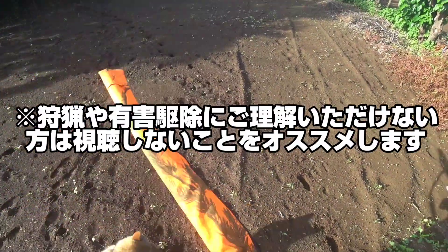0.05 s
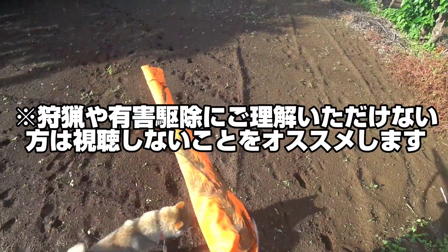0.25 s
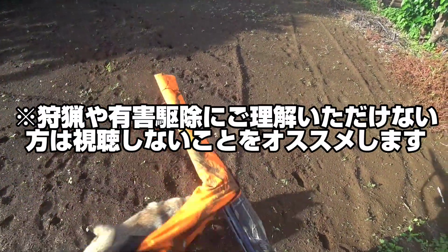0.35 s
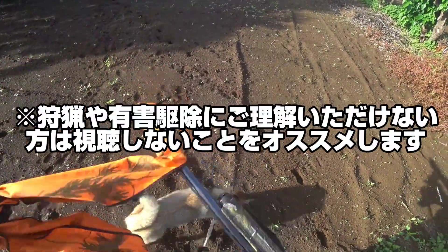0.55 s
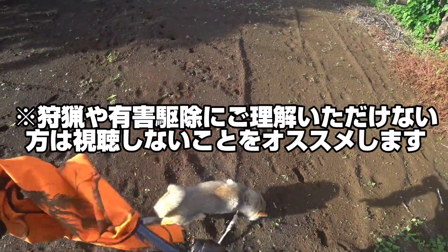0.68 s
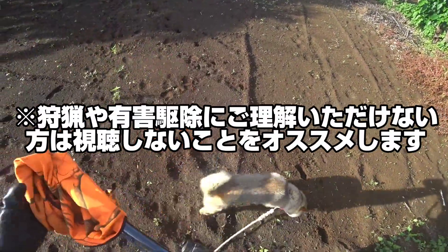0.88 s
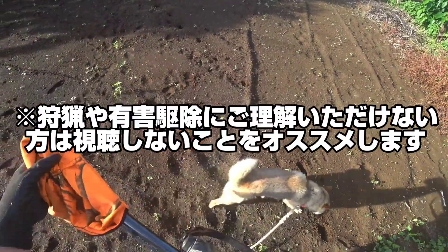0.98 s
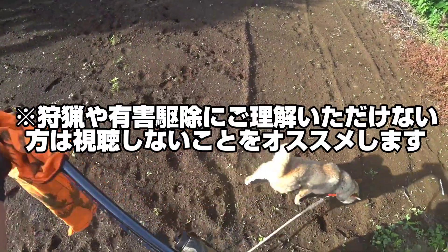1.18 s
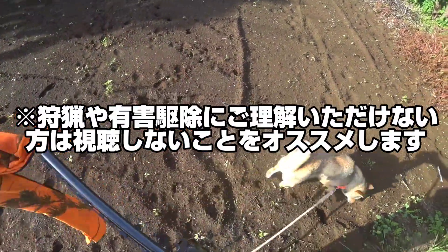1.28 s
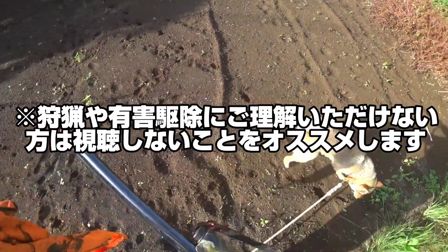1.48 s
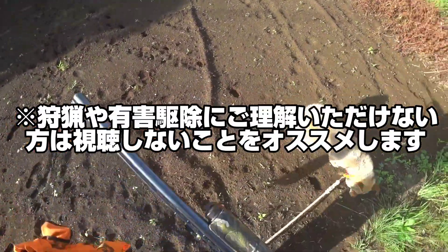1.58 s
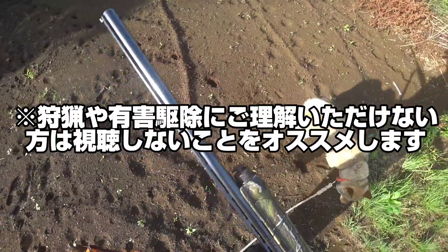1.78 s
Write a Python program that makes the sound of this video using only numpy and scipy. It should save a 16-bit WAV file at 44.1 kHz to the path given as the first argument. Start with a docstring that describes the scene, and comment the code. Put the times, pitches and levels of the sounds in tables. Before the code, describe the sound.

A small metal bell jingles brightly in irregular strikes close to the microphone. A cloth sleeve slides off a gun barrel with two quick fastener rips, then rustles and knocks softly, in a quiet open field.

```python
"""Unsleeving a gun barrel

A quiet open field, stereo microphone close to the hands. A cloth sleeve slides off a long barrel,
its fibres catching and slipping; the fastener's hooks let go in two rips and the gear knocks softly.
A small metal bell swings along, its clapper striking two bright notes at irregular moments.
Faint thin whistles glide behind it towards the end."""
import sys
import numpy as np
from scipy import signal
from scipy.fft import rfft, irfft
from scipy.io import wavfile

SR = 44100
rng = np.random.default_rng(int(sys.argv[2]) if len(sys.argv) > 2 else 0)


def to_wav(s):
    """Save 16-bit WAV."""
    ch = np.atleast_2d(s).T  # columns
    pcm = np.round(np.clip(ch, -1, 1) * 32767)  # PCM
    wavfile.write(sys.argv[1], SR, pcm.astype(np.int16))


N = 81585
T = np.arange(N) / SR


def amp(db):
    """Decibels to gain."""
    return 10 ** (np.asarray(db) / 20)


def unit(x):
    """Scales to an rms of one."""
    return x / np.sqrt(np.mean(x ** 2) + 1e-20)


def colour(x, spectrum):
    """Minimum-phase filter through (f/Hz, level/dB) points; keeps the power of white noise."""
    hz, db = np.transpose(spectrum)
    size = 4096
    bin_hz = abs(np.fft.fftfreq(size, 1 / SR))
    gain = unit(amp(np.interp(np.log(bin_hz + 1), np.log(hz), db)))
    taps = np.fft.ifft(np.exp(np.conj(signal.hilbert(np.log(gain))))).real
    return signal.fftconvolve(x, taps[:size // 2])[:N]


def drift(hz):
    """Smooth random motion up to about the given rate."""
    lowpass = np.exp(-(np.fft.rfftfreq(N, 1 / SR) / hz) ** 2)
    return unit(irfft(rfft(rng.standard_normal(N)) * lowpass, N))


def grains(per_s, spread_db):
    """Dense random clicks of uneven size."""
    size = amp(spread_db * np.minimum(rng.exponential(1, N), 3))
    return unit(size * rng.choice([-1, 1], N) * (rng.random(N) < per_s / SR))


def pan(x, db):
    """Places a sound at the microphone by its left-minus-right level."""
    return x * amp([[db / 2], [-db / 2]])


# side spectrum of diffuse sound, bass nearly mono (f/Hz, level/dB)
SIDE_SPECTRUM = [(30, -14), (90, -14), (250, 0), (1200, 5.5), (4000, 0.5), (11000, 4.5)]
def wide(make, side_db):
    """A shared centre with a weaker independent side."""
    return make() + np.array([[1], [-1]]) * amp(side_db) * colour(make(), SIDE_SPECTRUM)


# spectra of the open air and its rumble (f/Hz, level/dB)
AIR_SPECTRUM = [(15, -49), (25, -1.5), (64, -5), (381, -14), (603, -16), (1470, -20), (2850, -14),
                (4990, -27), (7130, -20), (11000, -33.5), (14300, -78), (22000, -120)]
RUMBLE_SPECTRUM = [(15, 11), (35, -8.5), (63, 10), (100, -6.5), (250, -2), (1000, -103)]
def field(air_db=-54, rumble_db=-54.5):
    """Quiet open air all around the microphone, over a low rumble."""
    def noise(spectrum):
        return wide(lambda: colour(rng.standard_normal(N), spectrum), side_db=-1)
    return amp(air_db) * noise(AIR_SPECTRUM) + amp(rumble_db) * noise(RUMBLE_SPECTRUM)


# course of the slide along the barrel (t/s, relative level/dB)
SLIDE_LEVELS = [(0, -43), (.1, -38.5), (.22, -40), (.3, -40.5), (.45, -54.5), (.6, -58.5), (.7, -57.5),
                (1.85, -64.5)]
# resonances of the hollow sleeve (f/Hz, width/Hz, level/dB)
SLEEVE_RESONANCES = [(643, 74, -12), (1135, 270, -9.5), (1595, 195, -9)]
# cloth rustles (centre t/s, half width/s, level/dB, body re crisp part/dB)
CLOTH_RUSTLES = [(0.333, 0.041, -38.5, -3.5), (0.427, 0.034, -37.5, -11.5), (0.49, 0.0093, -39.5, 8),
                 (0.562, 0.044, -43, -1.5), (0.674, 0.045, -53.5, -2.5), (0.796, 0.024, -47, -6.5),
                 (0.835, 0.015, -43, 1), (0.907, 0.039, -43.5, -11), (0.989, 0.03, -61.5, 9.5),
                 (1.102, 0.039, -46.5, -5.5), (1.205, 0.016, -42, -33), (1.279, 0.064, -47.5, -5.5),
                 (1.458, 0.032, -53, 0), (1.786, 0.012, -55.5, -2)]
# spectra of the slide and of a rustle's crisp part and dull body (f/Hz, level/dB)
SLIDE_SPECTRUM = [(60, -7), (200, -0.5), (480, 0.5), (800, 2.5), (1500, -3.5), (2200, -5.5), (4000, -10),
                  (11000, -19)]
CRISP_SPECTRUM = [(100, -9.5), (1000, 0), (2400, 5.5), (5000, 5.5), (7500, 4), (11000, -2.5)]
BODY_SPECTRUM = [(25, 6), (70, 1), (150, 0.5), (450, 0), (1200, -5), (2500, -7.5), (11000, -39)]
def sleeve():
    """Fibres catch and slip close to the microphone: a hollow slide, then separate rustles."""
    catch = amp(1.5 * drift(hz=68.6))

    def rub(spectrum):
        return wide(lambda: colour(catch * grains(per_s=9000, spread_db=3.5), spectrum), side_db=-9.5)
    friction = rub(SLIDE_SPECTRUM)
    hollow = sum(amp(db) * unit(signal.lfilter(*signal.iirpeak(hz, hz / width, SR), friction))
                 for hz, width, db in SLEEVE_RESONANCES)
    slide_level = amp(np.interp(T, *np.transpose(SLIDE_LEVELS)))
    slide = slide_level * (amp(-4.5) * friction + hollow)
    crisp, body = np.zeros((2, N))
    for centre, width, db, body_db in CLOTH_RUSTLES:
        swell = amp(db) * np.exp(-.5 * ((T - centre) / width) ** 2)
        crisp += swell
        body += swell * amp(body_db)
    rustles = crisp * rub(CRISP_SPECTRUM) + body * rub(BODY_SPECTRUM)
    return pan(slide, db=-1) + pan(rustles, db=1.2)


def turning(dips, waver_hz=3.93):
    """A bell note wavers in pitch and dips as its quiet side swings past the microphone."""
    gain = np.exp(2j * np.pi * np.cumsum(waver_hz * drift(hz=25.1)) / SR)
    for centre, width, db in dips:
        offset = (T - centre) / width
        gain *= (offset + 1j * amp(db)) / (offset + 1j)
    return gain


# clapper strikes (t/s, level/dB of low note, clang, high note, overtones and tick,
# low t60/s, high t60/s, left minus right/dB)
CLAPPER_STRIKES = [(.003, -38, -58, -48, -85, -35.5, 0.2, 0.89, 1),
                   (0.1934, -24.5, -40, -49, -75, -56, 0.21, 0.6, 2),
                   (0.5647, -9.5, -14.5, -15.5, -44, -16.5, 0.17, 0.067, -2.5),
                   (.572, -18.5, -29, -34, -39, -23, 0.63, 1.6, -3.5),
                   (0.6448, -13.5, -38, -26, -52, -34, 0.2, 0.82, -1.5),
                   (0.7247, -19.5, -29.5, -23, -59, -33.5, 0.24, 0.32, -2.5),
                   (0.8017, -28, -45, -26.5, -58, -42, 0.05, 0.22, -1),
                   (0.8461, -28, -44, -23, -50, -29, 0.21, 0.35, -3),
                   (0.9235, -22.5, -41, -28, -55, -53, .16, 0.31, -2.5),
                   (1.062, -37, -51, -54, -66, -47, 0.077, 0.18, -5.5),
                   (1.1014, -24, -22.5, -24, -42, -31, 1, 0.41, -2.5),
                   (1.1239, -17, -26, -28, -46.5, -42, 0.15, .5, -4),
                   (1.203, -39.5, -49, -34, -58, -50, 0.27, 0.39, -4.5),
                   (1.3961, -22, -47, -21.5, -39, -23.5, 0.41, .6, -4),
                   (1.4102, -15, -38, -19, -42, -29.5, 0.33, 0.74, -5),
                   (1.581, -25, -41.5, -46, -56.5, -39, 0.15, 0.12, -6)]
# bell overtones, the quick ones a splash in the attack (f/Hz, relative level/dB, t60/s)
BELL_OVERTONES = [(2466, -4, 1), (2920, -3, 0.068), (3080, 11, .025), (3910, 0.5, 0.023), (4870, 1, 0.024),
                  (7090, 1, 0.26), (7600, -1, 0.077)]
# spectrum of the clapper's tick (f/Hz, level/dB)
TICK_SPECTRUM = [(200, -28), (1500, -17.5), (3000, 8), (4300, -10.5), (5000, -6), (6000, -8), (7200, 10),
                 (8500, -6.5), (10000, 0.5), (12000, -21.5)]
# dips in each note as the bell turns (t/s, half width/s, level/dB)
LOW_NOTE_DIPS = [(.616, 0.019, -15), (1.434, 0.0073, -7.5), (1.535, 0.037, -17)]
HIGH_NOTE_DIPS = [(.686, 0.0079, -17), (.822, 0.013, -26), (.882, 0.0041, -21), (.99, 0.026, -21),
                  (1.161, 0.017, -33), (1.222, 0.017, -25), (1.448, 0.0074, -39)]
def bell(low_hz=2777.3, clang_hz=6820, high_hz=6989, rise_s=.002, tick_s=.0022):
    """Each touch of the clapper ticks and sets every mode ringing at a new strength."""
    out, tick_level = np.zeros((2, N)), np.zeros(N)
    low_turn, high_turn = turning(LOW_NOTE_DIPS), turning(HIGH_NOTE_DIPS)
    ends = [strike[0] for strike in CLAPPER_STRIKES[1:]] + [N / SR]
    for strike, end in zip(CLAPPER_STRIKES, ends):
        start, low_db, clang_db, high_db, overtone_db, tick_db, low_t60, high_t60, pan_db = strike
        span = (T >= start) & (T < end + rise_s)
        t = T[span] - start

        def mode(hz, db, t60):
            return amp(db) * np.exp(2j * np.pi * hz * T[span] - np.log(1000) * t / t60)
        ring = low_turn[span] * mode(low_hz, low_db, low_t60)
        ring += high_turn[span] * mode(high_hz, high_db, high_t60)
        ring += mode(clang_hz, clang_db, t60=.093)
        ring += amp(overtone_db) * sum(mode(*overtone) for overtone in BELL_OVERTONES)
        crossfade = np.minimum(t / rise_s, 1) * np.minimum(1 - (T[span] - end) / rise_s, 1)
        out[:, span] += pan(ring.real * crossfade, pan_db)
        tick_level[span] += amp(tick_db) * np.exp(-t / tick_s)
    ticks = colour(tick_level * rng.standard_normal(N), TICK_SPECTRUM)
    return out + pan(ticks, db=-3.5)


# bursts that make up the two rips (t/s, length/s, base level/dB, swell/dB)
RIP_BURSTS = [(0.327, 0.0036, -24.5, 2.5), (0.339, 0.0038, -18, -1), (0.3458, .018, -19, 0),
              (0.459, 0.012, -26.5, 4.5), (0.473, .015, -18.5, -1.5)]
# single hooks letting go (t/s, relative level/dB)
HOOK_SNAPS = [(.232, -30), (.2852, -22), (0.2983, -29), (0.3126, -11), (0.3144, -16), (0.324, -10.5),
              (0.331, -15), (1.197, -31), (1.488, -33)]
# spectrum of a hook's snap (f/Hz, level/dB)
HOOK_SPECTRUM = [(59, -70), (100, -9.5), (611, -2.5), (1340, -10.5), (1870, -8.5), (2150, -5.5),
                 (2420, -1.5), (2670, -5.5), (5640, 2.5), (11000, -7), (14300, -55), (22000, -120)]
def fastener(fade_s=.003):
    """At close range a few hooks snap alone and hundreds let go in short rips."""
    level, snaps = np.zeros((2, N))
    for start, length, db, swell_db in RIP_BURSTS:
        progress = np.clip((T - start) / length, 0, 1)
        fade = np.exp(-np.maximum(T - start - length, 0) / fade_s)
        level += (T > start) * amp(db + swell_db * (progress + .5)) * fade
    for start, db in HOOK_SNAPS:
        snaps[round(start * SR)] += amp(db + 8)
    rips = wide(lambda: colour(level * grains(per_s=3800, spread_db=1.5), HOOK_SPECTRUM), side_db=-28)
    return rips + colour(snaps, HOOK_SPECTRUM)


def reflections(x, db=-9.5, t60=.035):
    """A brief, weak spray reaches the microphone off the ground and the handler's body."""
    t = T[:SR // 4]
    tail = rng.standard_normal((2, len(t))) * np.exp(-np.log(1000) * t / t60)
    return amp(db) * signal.fftconvolve(x, tail / np.linalg.norm(tail[0]), axes=1)[:, :N]


# knocks of the gear (t/s, level/dB, f/Hz, width/s)
GEAR_KNOCKS = [(0.308, -28.5, 197, 0.0042), (.355, -28.5, 347, 0.0033), (0.487, -28.5, 305, 0.0054),
               (0.5664, -11.5, 604, 0.00043), (0.5747, -7, 1510, 0.0004), (.577, -30.5, 450, 0.0027),
               (0.5802, -23, 1130, 0.00078), (.587, -29.5, 324, 0.0022), (0.5862, -20.5, 1690, 0.00059),
               (0.565, -36.5, 65, 0.027), (1.0054, -33, 332, 0.002), (1.0055, -36.5, 600, .004),
               (1.26, -35.5, 219, 0.0023), (1.783, -37.5, 165, 0.0035), (1.783, -37.5, 580, 0.0016)]
def knocks():
    """The gear bumps in the hands, each knock one heavily damped tone."""
    out = np.zeros(N)
    for start, db, hz, width in GEAR_KNOCKS:
        t = np.maximum(T - start, 0)
        peak_s = width / 2
        envelope = t / peak_s * np.exp(1 - t / peak_s)
        out += amp(db) * envelope * np.sin(2 * np.pi * hz * t)
    return out


# thin whistles (t/s, length/s, start f/Hz, end f/Hz, level/dB, fuzz width/Hz)
WHISTLE_GLIDES = [(1.187, 0.033, 1325, 1380, -48, 88), (1.34, 0.069, 2270, 2140, -49, 80),
                  (1.43, 0.11, 4280, 4750, -67, 160), (1.548, .04, 4180, 3730, -61, 170),
                  (1.49, 0.18, 2870, 2876, -49.5, 19), (1.609, 0.16, 2865, 4300, -60.5, 300),
                  (1.713, .08, 3760, 3040, -54.5, 260), (1.789, .09, 2930, 2780, -51.5, 140)]
def whistles():
    """Faint gliding tones behind the bell, some nearly clean and some fuzzy."""
    out = np.zeros(N)
    for start, length, from_hz, to_hz, db, fuzz_hz in WHISTLE_GLIDES:
        progress = np.clip((T - start) / length, 0, 1)
        phase = 2 * np.pi * np.cumsum(from_hz + (to_hz - from_hz) * progress) / SR
        fuzz = drift(fuzz_hz) * np.pi / 2
        envelope = np.sqrt(2 * abs(np.sin(np.pi * progress)))
        out += amp(db) * envelope * np.cos(phase + fuzz)
    return pan(out, db=1)


def scene():
    """Cloth, bell and handling close up, the open field behind."""
    handling = pan(fastener() + knocks(), db=-1.3)
    return field() + sleeve() + bell() + handling + reflections(handling) + whistles()


def record(dry, ceiling=.45, edge_hz=11200):
    """The recorder saturates on the sharpest peaks, then cuts the top treble steeply."""
    oversampled = signal.resample_poly(dry, 2, 1, axis=1)
    rounded = oversampled / (1 + (oversampled / ceiling) ** 8) ** (1 / 8)
    lowpass = signal.firwin(301, edge_hz, window=("kaiser", 8), fs=SR)
    return signal.oaconvolve(signal.resample_poly(rounded, 1, 2, axis=1), lowpass[None], "same")


dry = scene()
out = record(dry)
to_wav(out)
```